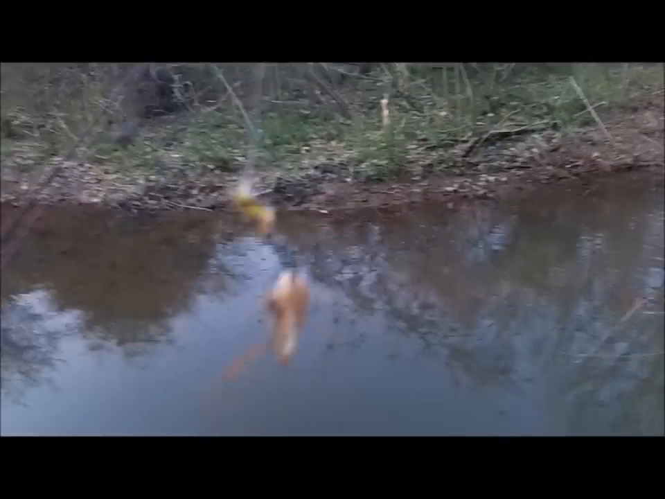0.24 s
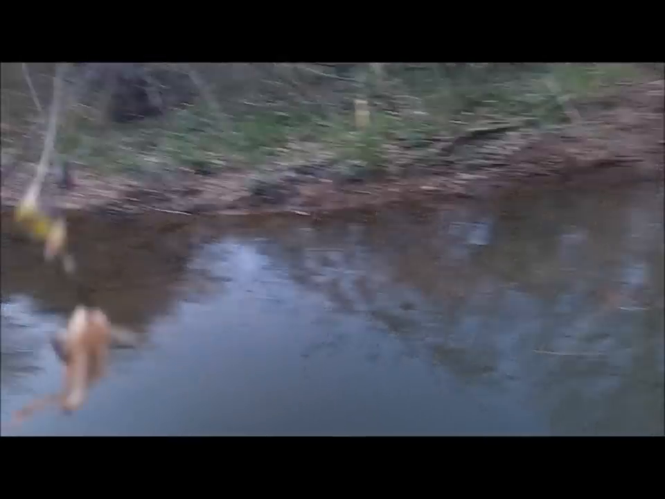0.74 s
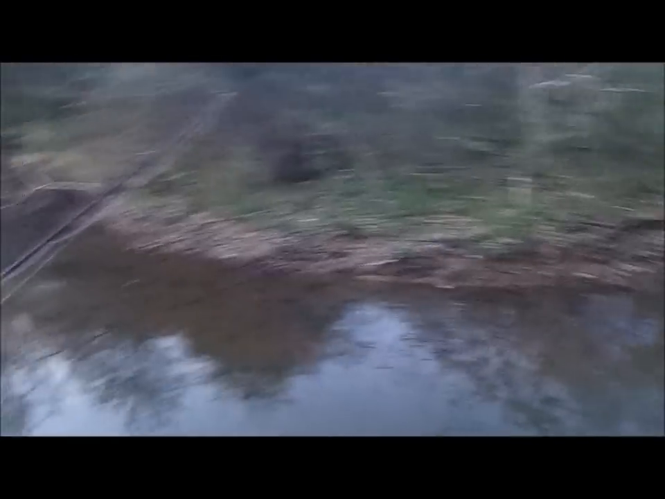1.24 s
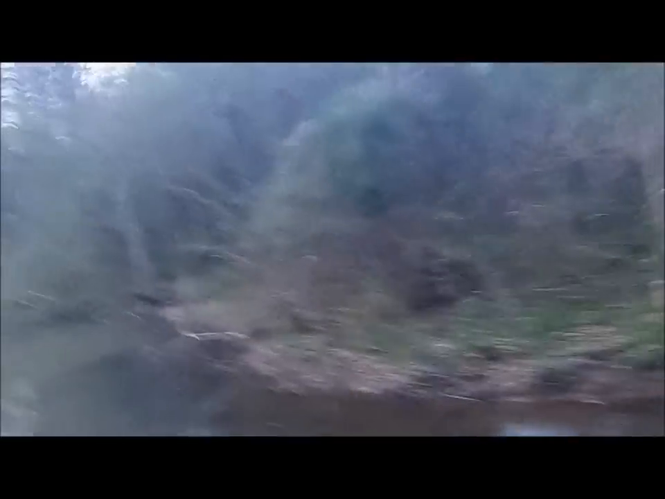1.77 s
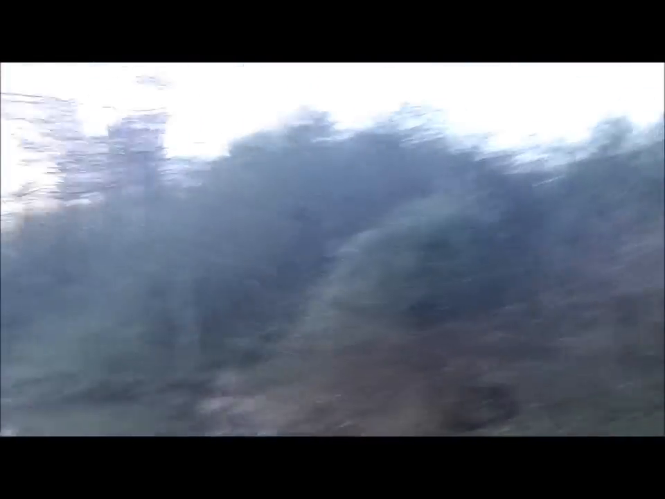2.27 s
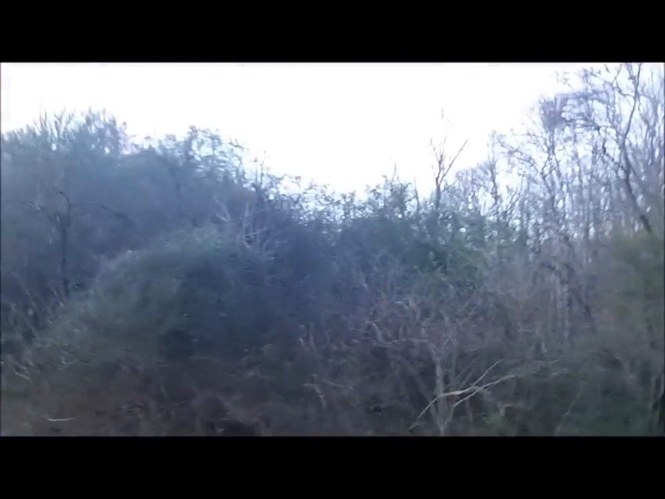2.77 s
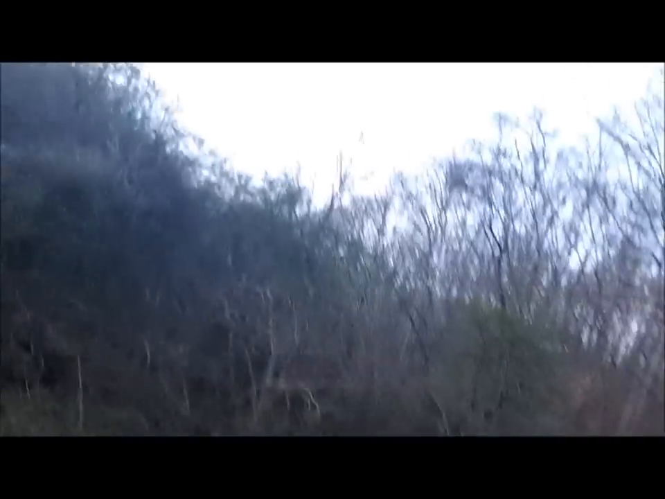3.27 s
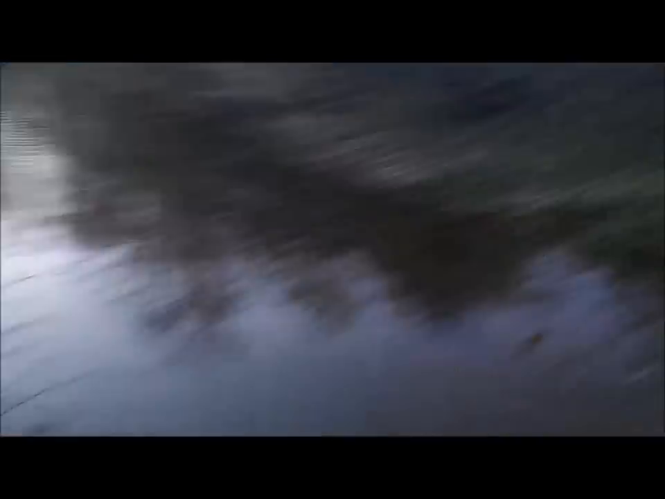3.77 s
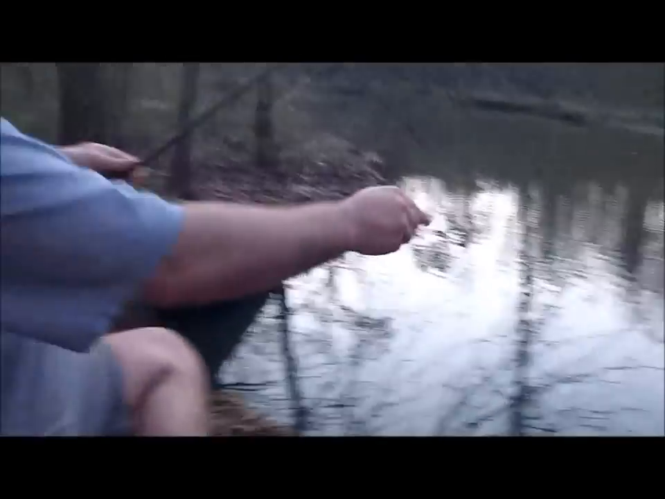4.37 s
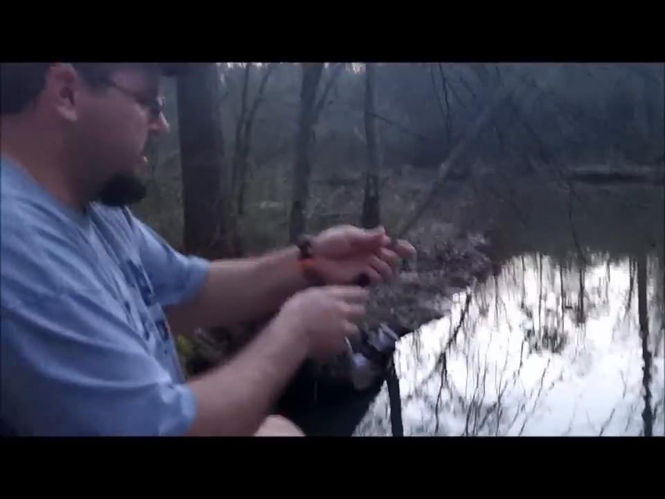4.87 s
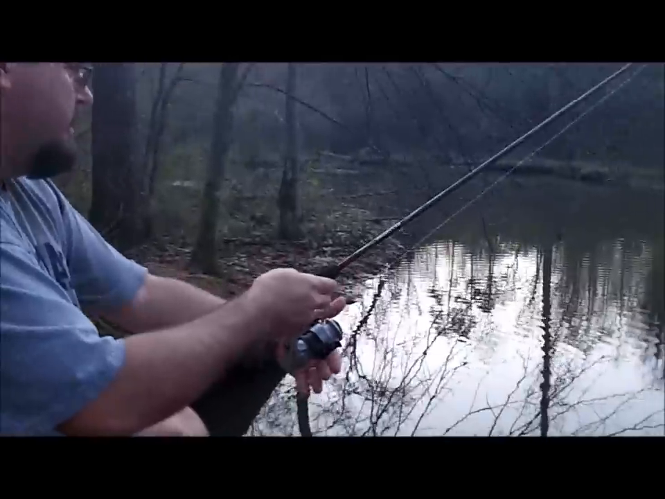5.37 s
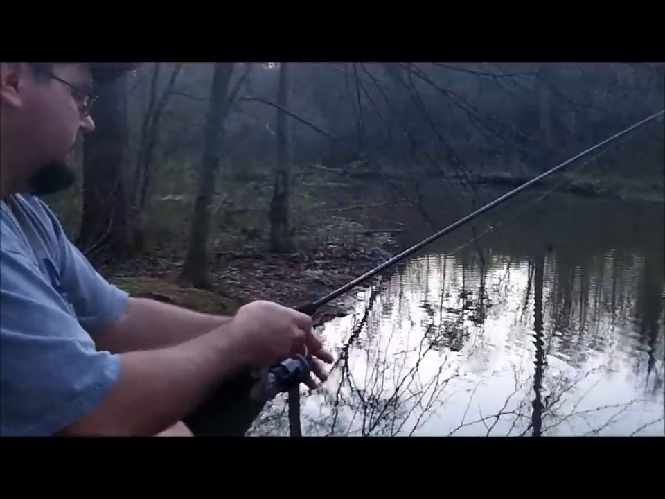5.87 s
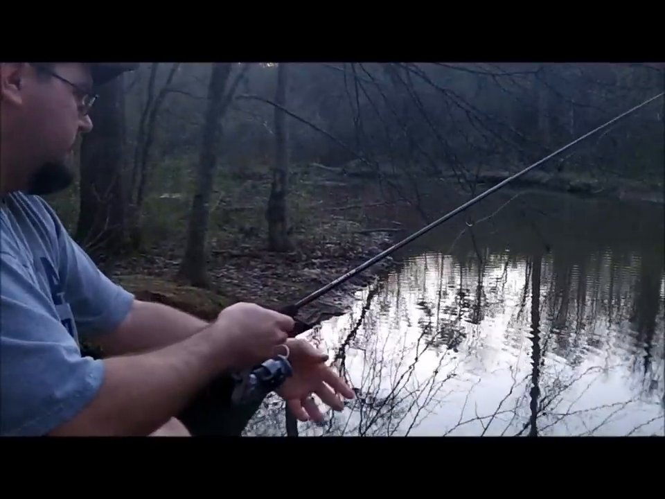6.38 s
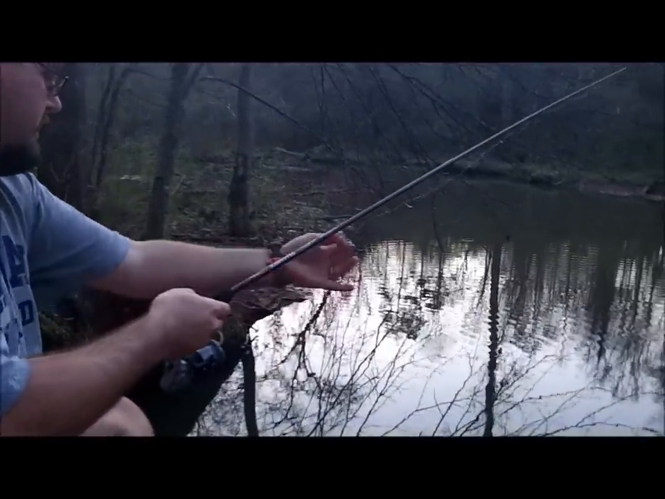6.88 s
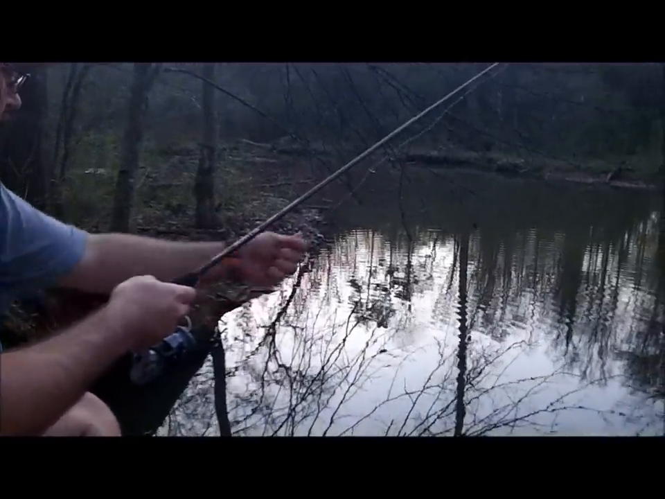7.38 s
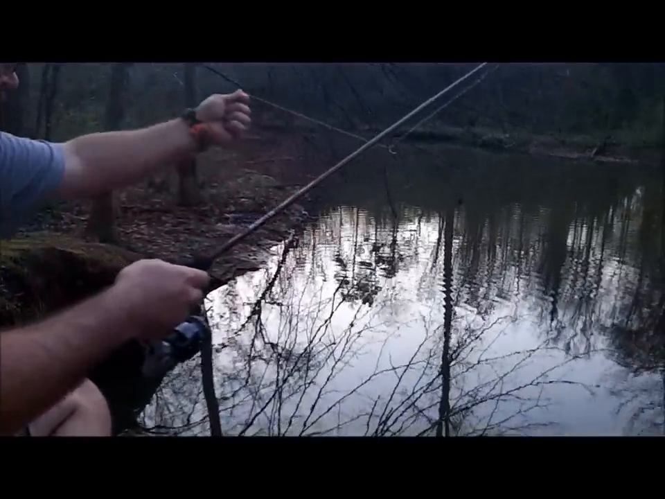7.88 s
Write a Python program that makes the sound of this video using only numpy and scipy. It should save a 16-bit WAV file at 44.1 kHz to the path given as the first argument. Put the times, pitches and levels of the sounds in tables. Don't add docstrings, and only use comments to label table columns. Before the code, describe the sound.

A dense chorus of small frogs peeps shrilly without pause beside a wooded creek at dusk, with handling rubs and faint tackle ticks.

```python
import sys
import numpy as np
from scipy import signal
from scipy.fft import rfft, irfft
from scipy.io import wavfile
from scipy.ndimage import uniform_filter1d

SR = 44100
rng = np.random.default_rng(int(sys.argv[2]) if len(sys.argv) > 2 else 0)


def invert_db(x):
    u = np.asarray(x, float) / 20
    return 10 ** u


def digitize_waveform(pressure):
    field = np.atleast_2d(pressure).T
    bounded = np.clip(field, -1, 1)
    quanta = np.round(bounded * 32767).astype(np.int16)
    wavfile.write(sys.argv[1], SR, quanta)


N = 358091
HZ = np.fft.rfftfreq(N, 1 / SR)
TIME = np.arange(N) / SR


def unit(x):
    return x / np.sqrt(np.mean(x ** 2))


def band(x, centre_hz, octaves):
    distance = np.log2((HZ + 1) / centre_hz) / octaves
    return irfft(rfft(x) * np.exp(-.5 * distance ** 2), N)


def walk(rate_hz):
    hold = int(SR / rate_hz)
    steps = np.repeat(rng.standard_normal(N // hold + 1), hold)
    return unit(uniform_filter1d(uniform_filter1d(steps, hold), hold)[:N])


def loudness(x):
    return uniform_filter1d(uniform_filter1d(x ** 2, 3000), 3000)


def woods(x, t60_s, delay_s):
    t = np.arange(SR) / SR
    tail = rng.standard_normal(SR) * invert_db(-60 * t / t60_s) * (t > delay_s)
    return signal.fftconvolve(x, tail / np.sqrt(np.sum(tail ** 2)))[:N]


def whistles(calls, low_db, third_db, fourth_db, bend=0.3036):
    out = np.zeros(N + 2 * SR)
    for s, length_s, start_hz, rise_hz, db in calls:
        u = np.arange(int(length_s * SR)) / (length_s * SR)
        glide = (1 - bend) * u + bend * u ** 3
        phase = np.cumsum(np.pi * (start_hz + rise_hz * glide) / SR)
        tone = np.sin(2 * phase) + invert_db(low_db) * np.sin(phase)
        tone += invert_db(third_db + 2.9 * rng.standard_normal()) * np.sin(3 * phase)
        tone += invert_db(fourth_db) * np.sin(4 * phase)
        swell = np.sin(np.pi * u ** 1.4) ** .8
        k = int((s + 1) * SR)
        out[k:k + len(u)] += invert_db(db) * swell * tone
    return out[SR:SR + N]


def sing(voice, calls):
    return [(s, *voice, db) for s, db in calls]


def near_frogs():
    # (length [s], start [Hz], rise [Hz])
    voices = [(.15, 2600, 380), (.12, 2660, 300), (.15, 2740, 540), (.13, 2760, 400), (.1, 2770, 230),
              (.12, 2830, 340), (.1, 2880, 260), (.11, 2950, 280), (.17, 2780, 300), (.08, 2900, 160),
              (.13, 2860, 440)]
    # (time [s], level [dB])
    frog_1 = [(0.535, -20.5), (1.149, -24.0), (1.672, -23.5), (2.107, -23), (2.897, -18.5), (4.121, -26),
              (5.242, -21), (6.048, -18.5), (6.623, -20.5), (7.23, -21), (7.854, -19)]
    frog_2 = [(-0.03, -22.1), (0.472, -19), (1.271, -18), (1.826, -16), (2.317, -23.5), (2.961, -17),
              (3.735, -17.2), (4.496, -17.5), (4.921, -20.5), (5.424, -19), (6.134, -17.5), (6.75, -16),
              (7.47, -21.5), (7.95, -22.2)]
    frog_3 = [(0.607, -16.5), (1.544, -16), (2.309, -17.5), (3.081, -15), (3.957, -25.5), (4.418, -17.5),
              (5.441, -18), (5.978, -22.5), (6.839, -27), (7.355, -17.5), (7.97, -14.5)]
    frog_4 = [(0.078, -21), (0.938, -18.5), (1.423, -25), (2.235, -16.5), (3.039, -18.5), (3.861, -16),
              (4.448, -24), (5.053, -20.5), (5.571, -20.4), (6.396, -20), (7.775, -16.5)]
    frog_5 = [(0.184, -20.6), (0.8, -23), (1.451, -15), (1.948, -15.5), (2.712, -19), (3.229, -25),
              (3.728, -18.5), (4.228, -19), (4.757, -25.5), (5.223, -21.3), (5.75, -18), (6.492, -18.5),
              (7.106, -28), (7.557, -16)]
    frog_6 = [(0.184, -20.5), (0.716, -18.5), (1.187, -25.5), (1.623, -25), (2.04, -20), (2.771, -17),
              (3.556, -21.5), (4.04, -19.5), (4.633, -19), (5.298, -18.8), (5.862, -19), (6.683, -22.8),
              (7.437, -16.5)]
    frog_7 = [(0.37, -16), (1.065, -17), (1.966, -21), (2.478, -17.5), (3.215, -16), (3.674, -14.5),
              (4.547, -19), (4.993, -16.6), (5.711, -15.5), (6.223, -20.5), (6.663, -16), (7.222, -16.5),
              (7.904, -18)]
    frog_8 = [(0.01, -18), (0.844, -17), (1.721, -26), (2.546, -20.5), (3.384, -19.5), (3.951, -15.5),
              (4.721, -17.5), (5.16, -23.9), (5.837, -20.5), (6.413, -19.5), (6.832, -18), (7.33, -24.5)]
    frog_9 = [(0.337, -21.5), (1.06, -22), (1.672, -20.9), (2.555, -20.0), (3.442, -25.5), (4.272, -26.5),
              (4.807, -21.5), (5.35, -24.5), (6.254, -25.5), (6.862, -18.5), (7.639, -21.5)]
    frog_10 = [(0.261, -15.5), (0.811, -20.5), (1.523, -19), (2.097, -14.5), (2.678, -17), (3.333, -18),
               (3.854, -20), (4.396, -17.5), (5.136, -17), (5.813, -15.7), (6.844, -16.5)]
    frog_11 = [(0.688, -20.5), (1.818, -23.5), (2.584, -28), (3.967, -25), (4.616, -28.5), (6.19, -20.5),
               (7.491, -26.5)]
    turns = [frog_1, frog_2, frog_3, frog_4, frog_5, frog_6, frog_7, frog_8, frog_9, frog_10, frog_11]
    calls = sum(map(sing, voices, turns), [])
    frogs = whistles(calls, low_db=-36, third_db=-35.5, fourth_db=-50)
    return frogs + invert_db(-8) * woods(frogs, t60_s=.45, delay_s=.004)


def chorus_db():
    # (time [s], level [dB])
    effort = [(0, -18.5), (1.2, -19.5), (1.5, -18.5), (3.3, -18), (3.6, -20.5), (3.9, -18), (4.25, -21),
              (4.55, -18.5), (6.9, -19), (7.15, -22), (7.3, -17.5), (8.12, -20.5)]
    # (time [s], depth [dB])
    lulls = [(.97, -2), (1.08, -0.5), (1.26, -2), (2.47, -2.5), (3.35, -1.5), (3.69, -1.5), (4.38, -1),
             (4.93, -6.5), (5.61, -5), (5.7, -2), (6.06, -1.5), (6.64, -4.5), (7.22, -1.5)]
    lull_s = 0.022
    s, db = np.transpose(effort)
    total_db = np.interp(TIME, s, db)
    for at_s, depth_db in lulls:
        total_db = total_db + depth_db * np.exp(-((TIME - at_s) / lull_s) ** 2)
    return total_db


def far_frogs(near, count=1100):
    late, long, far = rng.random((count, 3)).T
    size, glide = rng.standard_normal((count, 2)).T
    db = -8 * far - 4.27 * np.abs(size) ** 1.8
    time_s = (np.arange(count) + late) * 8.4 / count - .25
    length_s = .08 + 0.06962 * long
    start_hz = 2785 + 190 * np.clip(size, -2.3, 1.25)
    rise_hz = 280 + 70 * glide
    calls = np.transpose([time_s, length_s, start_hz, rise_hz, db])
    direct = whistles(calls, low_db=-42.5, third_db=-36, fourth_db=-50)
    wet = direct + invert_db(1.5) * woods(direct, t60_s=.6, delay_s=.004)
    whole = invert_db(chorus_db()) ** 2
    power = np.maximum(whole - loudness(near), 0.27 * whole)
    return wet * np.sqrt(power / loudness(wet))


def birds():
    # (length [s], start [Hz])
    chip_voice = (.07, 3280)
    # (time [s], rise [Hz], level [dB])
    chips = [(.01, 300, -32), (1.61, 303, -34), (2.337, 298, -34), (3.43, 300, -40), (4.348, 333, -30.5),
             (5.127, 286, -27.5), (6.18, 251, -28.5), (7.03, 274, -29.5), (7.825, 420, -30)]
    # (time [s], length [s], start [Hz], rise [Hz], level [dB])
    strays = [(.284, 0.041, 2530, -82, -37), (1.385, 0.057, 3490, 41, -33.5),
              (1.384, 0.054, 2200, 123, -37), (2.57, .029, 3800, -400, -41.5),
              (2.259, 0.045, 2600, 60, -24.5), (3.815, .016, 850, 33, -32), (3.842, 0.012, 1000, 29, -38),
              (4.12, 0.016, 880, 42, -35.5), (3.832, 0.016, 2970, 605, -29), (4.94, .044, 2270, 42, -41),
              (5.37, 0.049, 3450, 8, -34.5), (6.1, .2, 1670, 39.5, -49), (6.919, 0.12, 4200, 247, -39.5),
              (8.4, 0.032, 3370, -40, -31.5)]
    calls = [(s, *chip_voice, rise_hz, db) for s, rise_hz, db in chips] + strays
    notes = whistles(calls, low_db=-60, third_db=-60, fourth_db=-60, bend=-.45)
    return notes + invert_db(-7.5) * woods(notes, t60_s=.6, delay_s=.004)


def deep_frog():
    # (length [s], rise [Hz])
    deep_voice = (.12, 130)
    # (time [s], start [Hz], level [dB])
    deep_calls = [(.72, 2470, -34.5), (1.48, 2450, -31.5), (2.479, 2340, -37), (2.58, 2406, -38),
                  (3.21, 2440, -33), (3.391, 2450, -35.5), (3.92, 2420, -40), (4.064, 2495, -30.5),
                  (4.79, 2484, -30.5), (5.101, 2370, -31), (5.99, 2344, -34.5)]
    length_s, rise_hz = deep_voice
    calls = [(s, length_s, start_hz, rise_hz, db) for s, start_hz, db in deep_calls]
    frog = whistles(calls, low_db=-60, third_db=-60, fourth_db=-60)
    return invert_db(-3) * frog + invert_db(.5) * woods(frog, t60_s=.6, delay_s=.004)


def air():
    # (frequency [Hz], density [dB per Hz])
    hiss_spectrum = [(25, -66), (60, -84.5), (130, -80), (300, -81), (520, -77), (1000, -77.5),
                     (2100, -79.5), (3600, -83), (4800, -88.5), (6300, -91.5), (7200, -99), (9000, -97.5),
                     (11000, -93), (15200, -92)]
    hz, db = np.transpose(hiss_spectrum)
    colour = invert_db(np.interp(np.log(HZ + 1), np.log(hz), db))
    hiss = irfft(rfft(rng.standard_normal(N)) * colour, N) * np.sqrt(SR / 2)
    swell = walk(16)
    out = np.zeros(N)
    for centre_hz in 25 * 2 ** np.arange(0, 9.5, .5):
        out += invert_db(.7 * swell + .8 * walk(14)) * band(hiss, centre_hz, .22) * .9
    return out + (invert_db(1.3 * walk(9)) - 1) * band(out, 10500, .5)


def engines():
    # (time [s], low drone level [dB], high drone level [dB])
    drones = [
        (0, -66.5, -53.5),
        (.4, -58, -52.5),
        (.72, -58, -65.5),
        (1.4, -58.5, -59),
        (2.96, -58.5, -66.5),
        (7.73, -59, -61.5),
        (8.12, -56, -57),
    ]
    s, low_db, high_db = np.transpose(drones)
    low = unit(band(rng.standard_normal(N), 66, 0.088))
    high = unit(band(rng.standard_normal(N), 125, 0.023))
    top = unit(band(rng.standard_normal(N), 250, 0.0092))
    out = invert_db(np.interp(TIME, s, low_db)) * low
    return out + invert_db(np.interp(TIME, s, high_db)) * (high + invert_db(-6) * top)


def tackle():
    # (time [s], peak level [dB], ring [Hz])
    ticks = [(0.029, -19, 2180), (0.484, -19, 940), (0.818, -24.5, 1030), (0.836, -26.5, 2020),
             (1.906, -16, 2060), (1.941, -30, 1630), (1.961, -21.5, 830), (2.021, -22.5, 840),
             (2.059, -27.5, 1120), (2.348, -24.5, 1970), (2.934, -26, 1910), (3.667, -22.5, 1120),
             (3.686, -22, 1680), (3.839, -24.5, 1140), (5.128, -27, 2180), (5.775, -24.5, 2180)]
    out = np.zeros(N)
    t = np.arange(1000) / SR
    decay = invert_db(-60 * t / .014)
    for s, db, ring_hz in ticks:
        crack = 2 * rng.standard_normal(len(t))
        ring = np.sin(2 * np.pi * ring_hz * t)
        out[int(s * SR):][:len(t)] += invert_db(db - 2) * (ring + crack) * decay
    return band(out, 1100, 1.2)


def slips():
    # (time [s], length [s], level [dB], centre [Hz], high bands re rub [dB])
    rubs = [(0.596, .72, -41.5, 1900, -31), (1.023, .1, -40, 3370, -15.5), (1.226, .15, -27.5, 3160, -21.5),
            (1.511, 0.14, -34, 2380, -29.5), (1.662, .071, -32, 2200, -32.5),
            (1.712, 0.096, -30.5, 2060, -32), (1.797, .081, -37.5, 1780, -27.5),
            (1.879, .11, -30.5, 2200, -25.5), (1.956, 0.066, -37.5, 3470, -10.5),
            (3.568, 0.078, -41.5, 3570, -10), (3.752, 0.074, -26, 2360, -20),
            (3.799, 0.067, -41, 1080, -24), (4.195, 0.1, -35, 2200, -27.5), (4.2, .1, -38, 860, -32),
            (4.644, 0.31, -46.5, 600, -18.5), (5.12, 0.1, -44, 1500, -19), (5.757, .025, -34.5, 2990, -20),
            (3.682, 0.059, -39, 2000, -19)]
    # (centre [Hz], width [octaves], level [dB])
    high_bands = [
        (9850, .15, -1),
        (14200, .08, -6),
    ]
    # (time [s], length [s], level [dB], centre
    # [Hz])
    bumps = [(0.756, .11, -46.5, 200), (0.999, 0.56, -48, 70), (1.218, 0.097, -36.5, 165),
             (1.228, 0.14, -39, 720), (1.347, .051, -39.5, 90), (1.661, 0.13, -41.5, 35),
             (1.801, 0.24, -40, 110), (2.011, 0.032, -34.5, 60.4), (3.548, 0.38, -51, 59.9),
             (3.663, 0.029, -28, 53.7), (3.664, .02, -39, 600), (3.743, .092, -35.5, 50),
             (4.152, 0.14, -55, 200), (5.123, 0.021, -39, 80)]
    # (time [s], length [s], level [dB], centre [Hz], width [octaves])
    line_slip = (6.9, .17, -45, 4200, .13)
    rub_octaves, narrowing, bump_octaves = 0.72, 0.81, 1.31
    rows = [(*bump, bump_octaves) for bump in bumps] + [line_slip]
    for s, length_s, db, hz, sheen_db in rubs:
        rows.append((s, length_s, db, hz, min(rub_octaves * (2000 / hz) ** narrowing, .9)))
        for top_hz, octaves, top_db in high_bands:
            rows.append((s, length_s, db + sheen_db + top_db, top_hz, octaves))
    return rows


def hand():
    crackle_db = 2.5
    out = np.zeros(N)
    hz = np.fft.rfftfreq(2 ** 15, 1 / SR) + 1
    for s, length_s, db, centre_hz, octaves in slips():
        n = int(length_s * SR)
        crackle = invert_db(crackle_db * np.repeat(rng.standard_normal(256), 128))
        grit = rng.standard_normal(2 ** 15) * crackle
        colour = np.exp(-.7 * np.abs(np.log2(hz / centre_hz) / octaves) ** 1.7)
        patch = irfft(rfft(grit) * colour)
        swell = np.sin(np.pi * (np.arange(n) / n) ** .85)
        out[int(s * SR):][:n] += invert_db(db) * unit(patch[:n]) * swell
    return out


def scene():
    near = near_frogs() + deep_frog() + birds()
    stir = invert_db(-29) * unit(band(rng.standard_normal(N), 410, 1.18))
    voices = (near + far_frogs(near)) * (1 + stir)
    return (voices + air() + engines() + tackle() + hand())[None]


def seams(x):
    # (centre [Hz], width [Hz], steepness)
    notches = [
        (7870, 130, 2),
        (11850, 60, 1),
    ]
    gain = (HZ < 15300).astype(float)
    for hz, width_hz, steep in notches:
        gain *= 1 - np.exp(-np.abs((HZ - hz) / width_hz) ** 2 / 2) ** (1 / steep)
    return irfft(rfft(x) * gain, N)


def starve(x):
    window = signal.windows.kaiser_bessel_derived(2048, 4 * np.pi)
    hz, t, spec = signal.stft(np.pad(x, (33, 0)), SR, window, 2048, 1024)
    slot = (hz // 130).astype(int)
    frame = np.arange(len(t)) // 2
    busy = np.sum(np.abs(spec[(hz > 3700) & (hz < 7000)]) ** 2, axis=0)
    busy = np.clip(busy / np.median(busy), 0, 3.5)
    near_seam = .65 * np.exp(-((hz - 7850) / 700) ** 2) + .3 * np.exp(-((hz - 11900) / 250) ** 2)
    treble = np.clip(hz / 4000 - .8, 0, 1) * .06
    share = near_seam[:, None] + treble[:, None] * busy
    keep = rng.random((slot[-1] + 1, frame[-1] + 1))[slot][:, frame] > share
    keep[hz > 15080] *= rng.random(frame[-1] + 1)[frame] > .5
    return signal.istft(spec * keep, SR, window, 2048, 1024)[1][33:33 + N]


def band_limit(x):
    return signal.sosfilt(signal.butter(12, 16100, fs=SR, output="sos"), x)


def record(dry):
    mix = starve(seams(dry[0]))[None]
    return band_limit(mix)


dry = scene()
out = record(dry)
digitize_waveform(out)
```